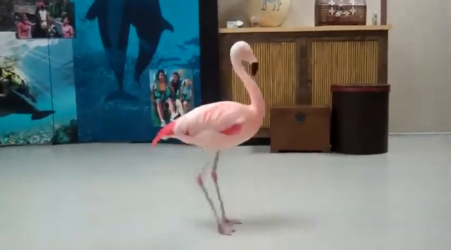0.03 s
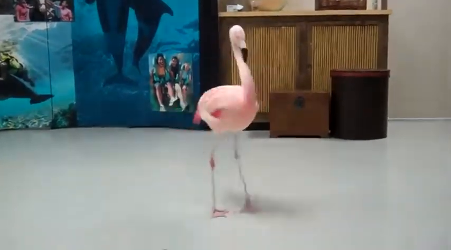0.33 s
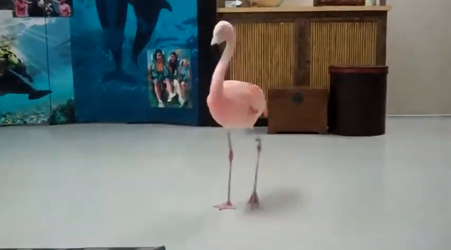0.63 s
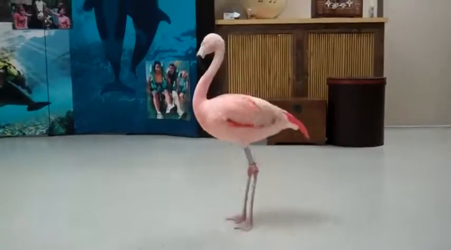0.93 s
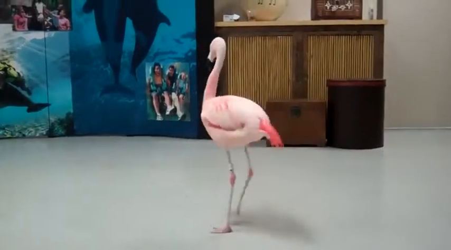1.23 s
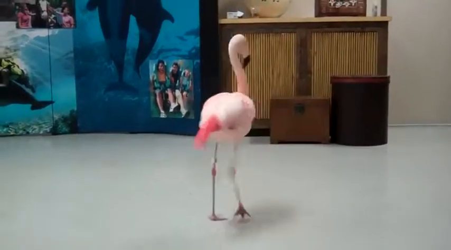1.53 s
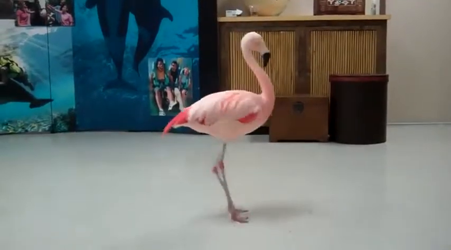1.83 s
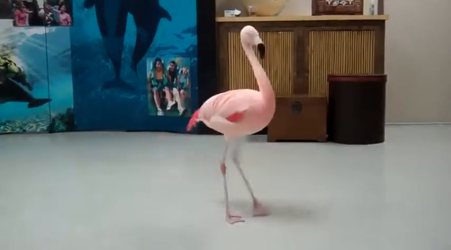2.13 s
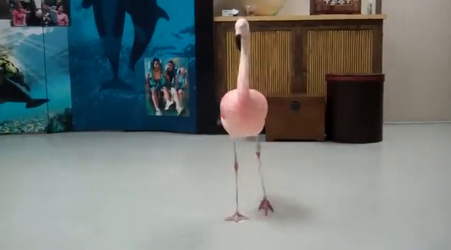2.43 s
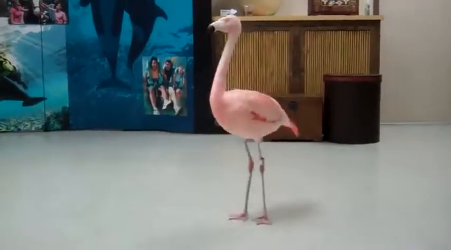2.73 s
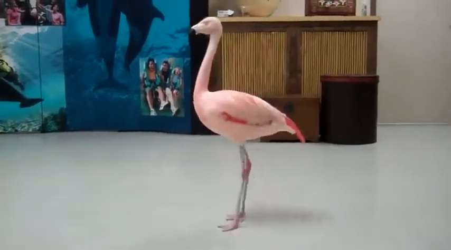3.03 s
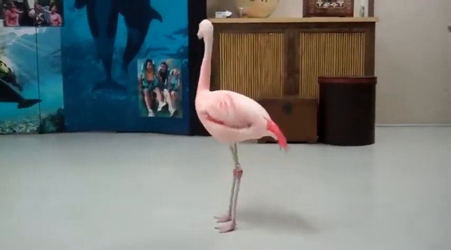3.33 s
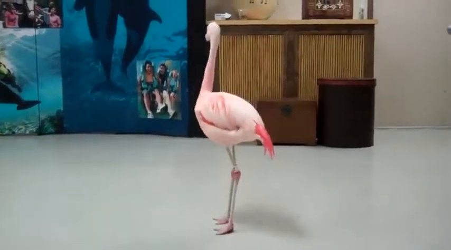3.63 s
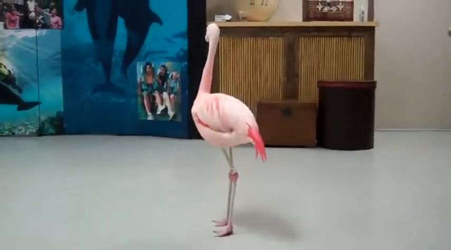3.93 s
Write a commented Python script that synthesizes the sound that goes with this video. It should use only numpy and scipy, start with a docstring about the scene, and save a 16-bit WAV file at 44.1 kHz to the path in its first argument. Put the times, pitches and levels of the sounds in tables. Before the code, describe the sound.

A flamingo's webbed feet tap and slap on a hard floor in an echoing room.

```python
"""A flamingo steps about on a hard indoor floor over a quiet ventilation hum.
Its steps come in pairs that slow down and stop. Each foot brushes the floor, its web slaps
with a short knock and a soft thud, and the claws click. After some steps the web patters
as it spreads flat. The bare room echoes and rings on."""
import sys
import numpy as np
from scipy import signal
from scipy.fft import rfft, irfft
from scipy.io import wavfile

SR = 44100
rng = np.random.default_rng(int(sys.argv[2]) if len(sys.argv) > 2 else 0)


def wav_record(signal):
    """Record a signal, one row per channel, as 16-bit PCM in the file named by sys.argv[1]."""
    frames = np.transpose(np.atleast_2d(signal))
    bounded = np.clip(frames, -1, 1)
    # unit amplitude maps onto the largest positive 16-bit level
    quanta = np.round(bounded * 32767).astype(np.int16)
    wavfile.write(sys.argv[1], SR, quanta)


N = 176400  # 4 seconds
T = np.arange(N) / SR
FREQS = np.maximum(np.fft.rfftfreq(N, 1 / SR), 1)
SIDES = np.array([[1], [-1]])  # plus on the left, minus on the right


def undb(db):
    """Turn decibels into a multiplier."""
    return 10 ** (np.asarray(db) / 20)


def unit(x):
    """Scale a sound to an average (rms) level of 1."""
    return x / np.sqrt(np.mean(x ** 2))


def burst(x, seconds=.004):
    """Give x the energy of a level-1 sound lasting this long."""
    return x * np.sqrt(seconds * SR / np.sum(x ** 2))


def curve(points):
    """Join (Hz, value) points into a value for every frequency."""
    hz, values = np.array(points, float).T
    return np.interp(np.log(FREQS), np.log(hz), values)


def shape(x, gain):
    """Turn each frequency up or down by its own gain."""
    return irfft(rfft(x) * gain, N)


def noise(tone):
    """Level-1 noise with the given tone."""
    return unit(shape(rng.standard_normal(N), undb(curve(tone))))


def stereo_noise(likeness):
    """Hiss in two ears; a likeness of 1 makes them nearly the same."""
    alike = np.clip(curve(likeness), -.98, .98)
    shared = shape(rng.standard_normal(N), np.sqrt((1 + alike) / 2))
    opposite = shape(rng.standard_normal(N), np.sqrt((1 - alike) / 2))
    return shared + SIDES * opposite


def grains(per_second, hiss):
    """Tiny random ticks over a little hiss."""
    return rng.standard_normal(N) * ((rng.random(N) < per_second / SR) + hiss)


def fade(t, fade_s):
    """Die away by 60 dB in the fade time, fade_s."""
    return np.exp(-np.log(1000) * t / fade_s)


def pulse(t, rise_s, fade_s):
    """Rise in a straight line and die away."""
    return np.minimum(t / rise_s, 1) * fade(t, fade_s)


def contact(t, rise_s):
    """The rounded swell of a foot meeting the floor."""
    return 1 - np.exp(-(t / rise_s) ** 2)


def bell(x, width):
    """A smooth hump, highest where x is 0."""
    return np.exp(-.5 * (x / width) ** 2)


def add(out, start, x):
    """Mix in a short sound at start seconds."""
    i = max(int(start * SR), 0)
    out[i:i + len(x)] += x[:N - i]


def snip(x, start, t):
    """Cut a piece as long as t from a long noise."""
    return x[..., int(start * SR):][..., :len(t)]


# Each row: frequency in Hz, relative level of the hum in dB.
HUM_TONE = [(25, -12), (60, -10.5), (90, -9), (125, -7), (190, -8.5), (280, -7), (520, -7.5), (800, -11),
            (1400, -12), (3900, -15.5), (6900, -20.5), (8000, -23), (11500, -32), (12800, -51),
            (15000, -58)]
# Each row: frequency in Hz, how alike the two ears are from 0 to 1.
HUM_LIKENESS = [(30, 0.23), (130, 0.64), (600, 0.57), (2000, 0.17), (8000, 0.056)]
# The recorder turns the background down. Each row: middle in seconds, width in seconds, change in dB.
RECORDER_DIPS = [(1.64, 0.038, -5), (1.82, 0.031, -1.5), (1.98, 0.063, -7.5), (2.325, 0.066, -7.5)]

def ventilation():
    """Moving air hums with a faint high whine; the recorder briefly turns it down at set times."""
    air = unit(shape(stereo_noise(HUM_LIKENESS), undb(curve(HUM_TONE))))
    whine_hz, width_hz = 7870, 80
    whine_band = 1 / (1 + (2 * (FREQS - whine_hz) / width_hz) ** 2)
    whine = unit(shape(stereo_noise(HUM_LIKENESS), whine_band))
    recorder_db = sum(db * bell(T - middle, width) for middle, width, db in RECORDER_DIPS)
    return (undb(-58) * air + undb(-78) * whine) * undb(recorder_db)


# Each row: landing time in seconds, the brush's head start in seconds, then relative levels
# in dB of the brush, thud, room echo, deep bass and high sizzle.
STEPS = [(0.0544, 0.015, -48.5, -48.5, -7.5, 0, 1.5), (0.205, 0.01, -57, -56, 0.5, -2, 0),
         (0.4, 0.014, -53, -50.5, -4, -2, 5), (0.5683, 0.0033, -64, -56, -2, 0, 9.5),
         (0.785, 0.0099, -52.5, -50, -3.5, 3, 6.5), (0.961, 0.0031, -73, -50, -0.5, 1.5, -4),
         (1.146, 0.0064, -50.5, -50.5, -5, 3, 2.5), (1.3081, 0.0057, -57, -46.5, -5.5, 0, 4),
         (1.509, 0.0061, -50, -53, -8.5, 1, 4.5), (1.665, 0.003, -65, -50, -1.5, -5.5, 3),
         (1.8528, 0.0092, -49, -52, -6.5, -1, 4), (2.0073, 0.0049, -53.5, -54, -1, 0.5, -6),
         (2.2039, 0.007, -49.5, -50, -12.5, 0.5, 6), (2.357, 0.0036, -55.5, -52, -1.5, -2.5, 0),
         (2.5725, 0.0092, -55.5, -60, -2, 6, 4), (2.7204, 0.0023, -65, -54.5, -2, -5, -8),
         (2.7613, 0.011, -49.5, -52.5, -0.5, -1, 2), (3.025, 0.0098, -53, -56, -1, -0.5, 3.5),
         (3.2309, 0.0053, -52, -48.5, -1.5, -0.5, 0)]
# Each row in these two: frequency in Hz, relative level in dB.
BRUSH_TONE = [(400, -23), (1400, -4), (2500, 8.5), (3700, 3), (5000, 3.5), (9500, -2.5), (12500, -12.5),
              (15500, -63)]
THUD_TONE = [(40, -18), (80, -37), (120, 4.5), (190, -6.5), (270, 0), (380, -9), (520, -5.5), (900, -10),
             (1500, -11), (4000, -44)]

def soles():
    """The sole brushes the floor, then the weight lands with a soft thud."""
    brush_level, thud, t = np.zeros(N), np.zeros(N), T[:SR // 5]
    rumble = noise(THUD_TONE)
    for start, lead_s, brush_db, thud_db, *_ in STEPS:
        add(brush_level, start - lead_s, undb(brush_db + 7) * pulse(t, rise_s=.0044, fade_s=.099))
        push = snip(rumble, start, t) * pulse(t, rise_s=.0017, fade_s=.11)
        add(thud, start, undb(thud_db + 1) * burst(push, seconds=.0093))
    friction = unit(shape(grains(per_second=770, hiss=.15), undb(curve(BRUSH_TONE))))
    return brush_level * friction, thud


# Each row: start in seconds, knock pitch in Hz, relative levels of knock and crack in dB,
# the knock's fade time in seconds.
SLAPS = [(0.052, 2306, -32.5, -41, .011), (0.2041, 2590, -44, -47, 0.0084), (0.211, 2420, -60, -49, .006),
         (0.401, 2290, -42.5, -40, 0.01), (0.569, 2450, -39.5, -41, .005), (0.5768, 2030, -45, -47, 0.013),
         (0.7862, 2290, -45, -42, 0.01), (0.9606, 2620, -35, -40.5, 0.0042), (0.9654, 2290, -41, -63, .007),
         (0.9706, 2530, -52, -55, 0.0088), (1.1522, 2280, -42, -39.5, .007),
         (1.307, 2340, -38, -34, 0.0048), (1.3143, 2040, -34, -65, 0.012), (1.5071, 2690, -42, -39, .008),
         (1.663, 2520, -56, -44, .005), (1.6656, 2720, -36.5, -47.5, 0.0046),
         (1.671, 2090, -38.5, -62, 0.01), (1.854, 2330, -36, -44, .009),
         (2.0083, 2450, -38.5, -39.5, .0045), (2.014, 2220, -45, -58, 0.0062),
         (2.0184, 2500, -47, -65, 0.0067), (2.022, 2400, -56, -47.5, .005),
         (2.2065, 2180, -39.5, -49, 0.0051), (2.3597, 2300, -42.5, -48, 0.0076),
         (2.363, 2100, -44, -49, .006), (2.5678, 2400, -53, -53, .006), (2.5743, 2300, -47.5, -46, .007),
         (2.7205, 1300, -57, -65, 0.0046), (2.7602, 2130, -37.5, -55, 0.0053),
         (3.2324, 2700, -40.5, -54, .011), (3.2375, 2180, -43, -49, .009)]
# Each row: multiple of the knock's pitch, relative level in dB, share of its fade time.
KNOCK_NOTES = [(.55, -4, 0.8), (1, 14.5, 1), (1.24, 0, 0.47), (1.62, 1, 0.85)]
# Each row: frequency in Hz, relative level of the crack in dB.
SLAP_TONE = [(300, -24), (1200, -12), (2500, -2.5), (4500, 2), (7000, -1), (10300, -5.5), (13000, -16),
             (15500, -11)]

def web_slaps():
    """The web hits the floor with a crack and a knock that dies quickly."""
    out, t, hiss = np.zeros(N), T[:SR // 20], noise(SLAP_TONE)
    for start, hz, knock_db, crack_db, fade_s in SLAPS:
        ring = sum(undb(db) * np.sin(2 * np.pi * hz * ratio * t) * fade(t, fade_s * share)
                   for ratio, db, share in KNOCK_NOTES)
        knock = burst(ring * contact(t, rise_s=.00045))
        crack = burst(snip(hiss, start, t) * fade(t, .01) * contact(t, rise_s=.00029))
        add(out, start, undb(knock_db - 3) * knock + undb(crack_db - 2) * crack)
    return out


# Each row: start in seconds, relative level in dB, brightest frequency in Hz.
CLICKS = [(0.0603, -30.5, 5600), (0.0663, -47, 5760), (0.4077, -38, 5500), (0.4155, -47.5, 6850),
          (0.7894, -39, 5550), (0.7941, -39, 6900), (0.8007, -41.5, 8400), (0.9606, -41.5, 4300),
          (1.1432, -45.5, 6950), (1.1454, -45, 6600), (1.1552, -39, 6500), (1.1612, -40.5, 6900),
          (1.1674, -40.5, 7360), (1.3054, -45, 6000), (1.3092, -42, 6600), (1.5142, -41, 6200),
          (1.52, -35, 5500), (1.5282, -38.5, 8360), (1.8613, -34, 6470), (2.2074, -45, 5930),
          (2.2138, -34.5, 6000), (2.3715, -47, 6600), (2.5778, -41.5, 5960), (2.582, -47.5, 7200),
          (2.589, -45, 7600), (2.7199, -50.5, 6100), (3.0188, -52, 6630), (3.0236, -49, 6100),
          (3.0314, -51, 5250), (3.0446, -47, 6500), (3.0503, -43.5, 5940), (3.23, -53, 5900)]
# Each row: a claw's ringing pitch in Hz, relative level in dB, fade time in seconds.
CLAW_NOTES = [(4877, 1.5, 0.011), (5340, -6.5, 0.0075), (6950, -2.5, 0.0069), (6514, 1, 0.0052),
              (8030, 0, 0.006), (9190, 0, 0.0056), (9930, -3, 0.0047), (12600, 6.5, 0.0028)]
# Each row: frequency in Hz, relative level of the click's wet crack in dB.
CLICK_TONE = [(1000, -8), (4500, 1.5), (7500, 1), (10000, -5), (13000, -5.5), (15500, -4)]

def claw_clicks():
    """A claw strikes the floor and rings, favouring notes near its brightest frequency."""
    out, t, hiss = np.zeros(N), T[:SR // 20], noise(CLICK_TONE)
    swell = contact(t, rise_s=.0006)
    for start, db, bright_hz in CLICKS:
        detunes, nudges = rng.standard_normal((2, len(CLAW_NOTES)))  # no two clicks are alike
        ring = np.zeros(len(t))
        for (hz, note_db, fade_s), detune, nudge in zip(CLAW_NOTES, detunes, nudges):
            level = undb(note_db + 1.5 * nudge) * bell(np.log2(hz / bright_hz), width=.39)
            note = np.sin(2 * np.pi * hz * (1 + .01 * detune) * t + np.pi * detune)
            ring += level * note * fade(t, fade_s)
        crack = snip(hiss, start, t) * fade(t, .01)
        add(out, start, undb(db - 2.5) * (burst(ring * swell) + undb(-5) * burst(crack * swell)))
    return out


def step_edges():
    """The samples where one step's share of the sound ends and the next begins."""
    times = np.array(STEPS)[:, 0]
    halfway = (times[1:] + times[:-1]) / 2
    return (SR * np.r_[0, halfway, N / SR]).astype(int)


# Each row: frequency in Hz, relative level of the echo's tail in dB, fade time in seconds.
ROOM_BANDS = [(128, -1, 1), (275, 4.5, 1), (400, 3, 1), (480, 6, 1), (1150, 2.5, 0.89), (2200, 0.44, 0.9),
              (3340, 0.1, 0.71), (6500, -0.5, 0.39), (11300, 3, 0.33), (13200, -1, 0.22), (15500, -22, .1)]
# Each row: a narrow ring's pitch in Hz, width in Hz, boost in dB.
ROOM_RINGS = [(1883, 99, 2.5), (4850, 470, 0), (8430, 510, 2)]
# Each row: frequency in Hz, how alike the two ears are from 0 to 1.
ROOM_LIKENESS = [(100, 0.99), (500, 1), (2000, 0.6), (8000, 0.025)]
# Each row: frequency in Hz, relative level of the wall echoes in dB.
WALL_TONE = [(150, -4.5), (1000, -4), (2600, 2), (4200, -1.5), (5500, -3), (10500, -2), (14000, -4)]

def room(feet):
    """Sound bounces back as early echoes, a cluster off the walls and a tail, new for each step."""
    out, t = np.zeros((2, N)), T[:SR * 3 // 4]
    wash, early = stereo_noise(ROOM_LIKENESS), stereo_noise(ROOM_LIKENESS)
    rings = 1 + sum((undb(db) - 1) / (1 + 2j * (FREQS - hz) / width) for hz, width, db in ROOM_RINGS)
    arrived = t > .0045  # silence until the first echo
    layers = []
    for hz, db, fade_s in ROOM_BANDS:
        band = curve([(row[0], row[0] == hz) for row in ROOM_BANDS])  # 1 here, 0 at the other bands
        layers.append((shape(wash, rings * band), undb(db) * burst(fade(t, fade_s) * arrived, 1 / SR)))
    walls = shape(stereo_noise(ROOM_LIKENESS), undb(curve(WALL_TONE)))
    layers.append((walls, undb(-5) * burst(bell(t - .029, width=.0085), 1 / SR)))  # 29 ms late
    early_level = undb(-9) * burst(fade(t, .23) * arrived, 1 / SR)
    side_level = undb(-12.5) * burst(fade(t, .0025), 1 / SR)
    edges = step_edges()
    for k, (begin, end, (*_, room_db, _, _)) in enumerate(zip(edges, edges[1:], STEPS)):
        place = k * (T[-1] - t[-1]) / len(STEPS)  # each step takes its own piece of the noise
        tail = undb(room_db) * sum(snip(hiss, place, t) * level for hiss, level in layers)
        near = snip(early, place, t) * early_level + SIDES * rng.standard_normal(len(t)) * side_level
        echoes = signal.fftconvolve(feet[None, begin:end], tail + near, axes=1)
        for ear, echo in zip(out, echoes):
            add(ear, begin / SR, echo)
    return out


# Each row: start in seconds, relative level in dB, middle frequency in Hz.
SPREADS = [(0.206, -53, 3020), (0.579, -56, 2940), (0.958, -40.5, 3230), (1.312, -42.5, 1990),
           (1.669, -61, 2870), (2.011, -47.5, 3030), (2.358, -49, 2850), (2.754, -55, 1850),
           (3.233, -41.5, 2200)]

def web_spreads():
    """The web flattens after a heavy step with a brief, fine patter."""
    out, t = np.zeros(N), T[:SR // 5]
    ticks, width_octaves = grains(per_second=1700, hiss=.084), .65
    for start, db, hz in SPREADS:
        patter = unit(shape(ticks, 1 / (1 + (np.log2(FREQS / hz) / width_octaves) ** 2)))
        add(out, start, undb(db) * snip(patter, start, t) * pulse(t, rise_s=.00022, fade_s=.094))
    return out


def per_step(x, band, step_db):
    """Raise or lower one band by each step's own amount."""
    gain = undb(np.repeat(step_db, np.diff(step_edges())))
    return x + shape(x, band) * (gain - 1)


# Each row: frequency in Hz, boost or cut in dB for all foot sounds but the thud.
FOOT_TONE = [(100, -12), (1300, 3), (2300, 0.5), (4000, -1), (10000, 0), (13500, -4.5), (15000, -32)]
# Each row: frequency in Hz, how much louder the feet are on the left in dB.
FOOT_PAN = [(300, -2.5), (2300, 0.5), (6000, -2.5), (9000, 7.5), (12500, 4.5)]

def scene():
    """Mix the feet, their echoes and the hum."""
    brush, thud = soles()
    *_, deep_db, sizzle_db = np.array(STEPS).T
    taps = shape(web_slaps() + claw_clicks() + web_spreads() + brush, undb(curve(FOOT_TONE)))
    taps = per_step(taps, 1 / (1 + (10400 / FREQS) ** 10), sizzle_db)  # wet sizzle above 10400 Hz
    thud = per_step(thud, 1 / (1 + (FREQS / 207) ** 10), deep_db)  # weight below 207 Hz
    direct = shape(taps + thud, undb(SIDES * curve(FOOT_PAN) / 2))
    return direct + room(taps + undb(2) * thud) + ventilation()


def record(dry):
    """The recorder cuts the treble above 15700 Hz."""
    return signal.sosfilt(signal.ellip(8, .2, 70, 15700, fs=SR, output="sos"), dry)


dry = scene()
out = record(dry)
wav_record(out)
```